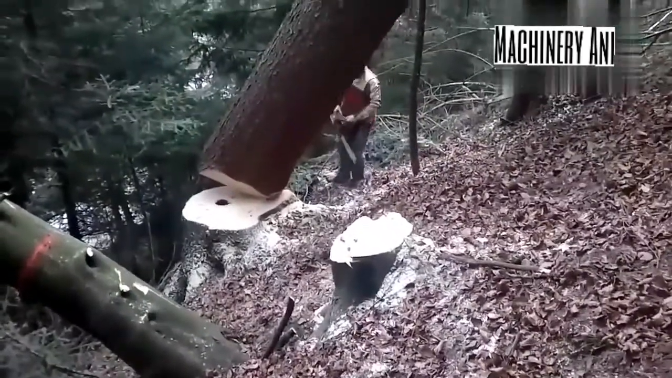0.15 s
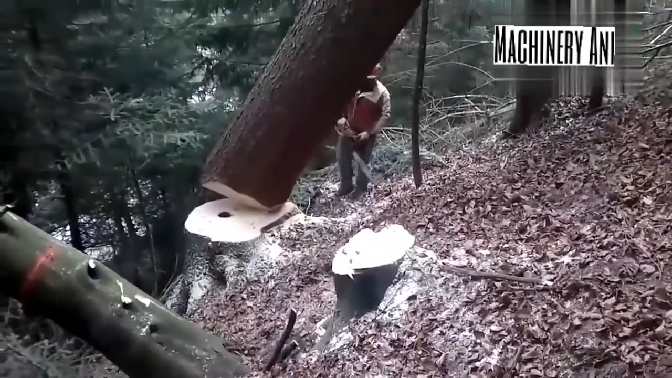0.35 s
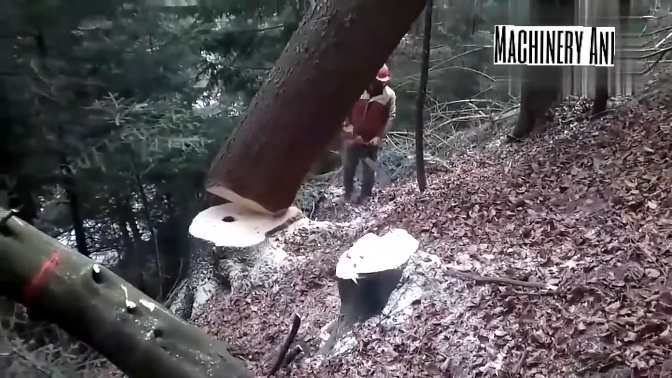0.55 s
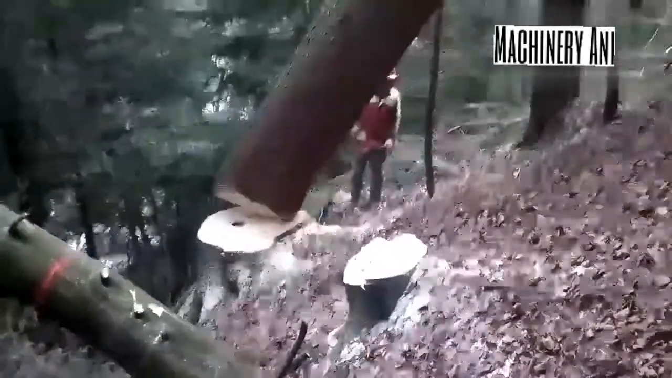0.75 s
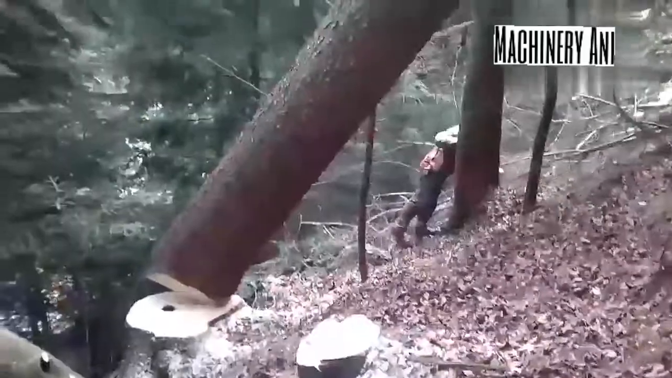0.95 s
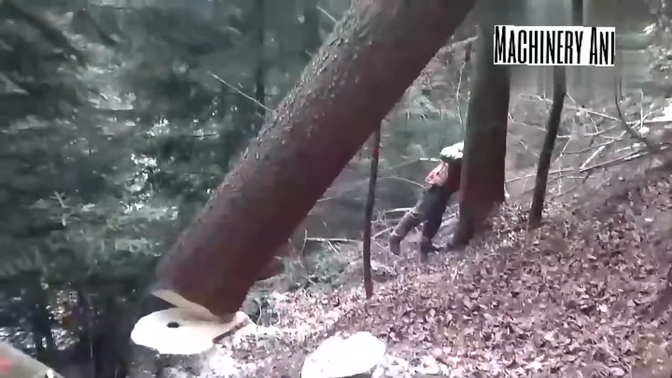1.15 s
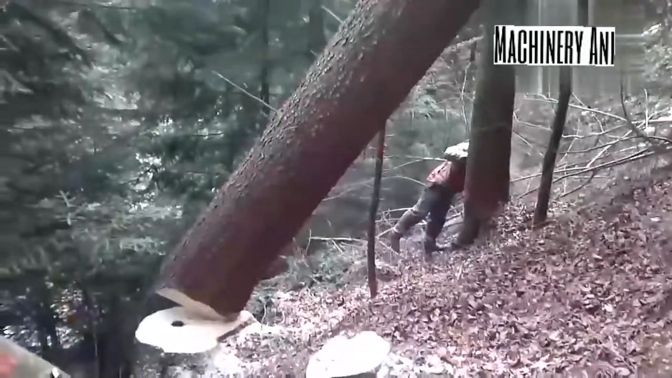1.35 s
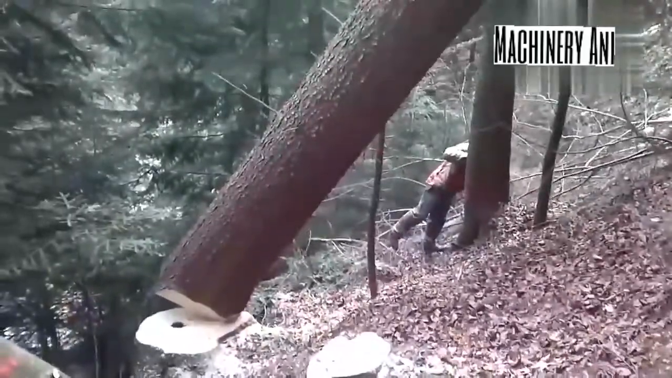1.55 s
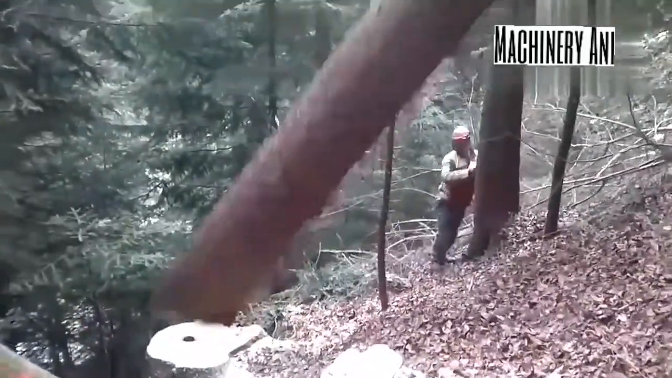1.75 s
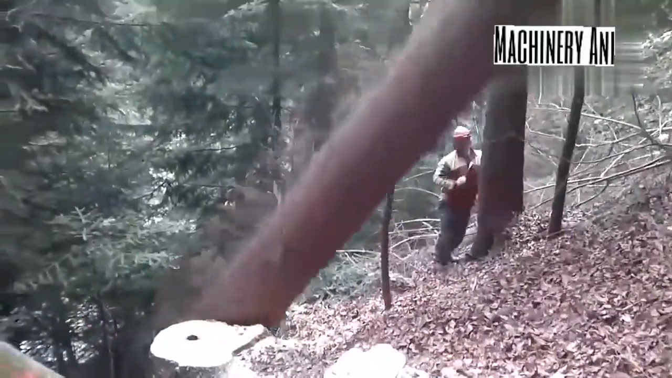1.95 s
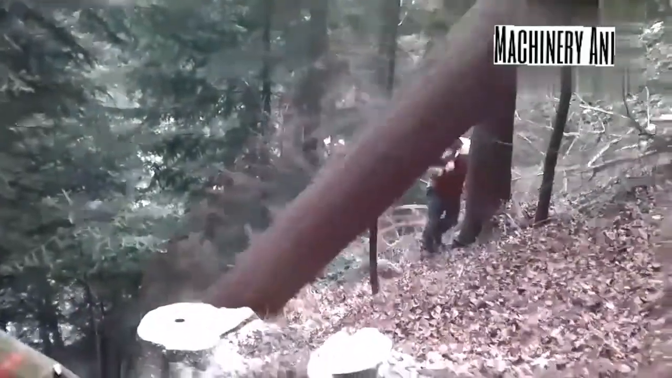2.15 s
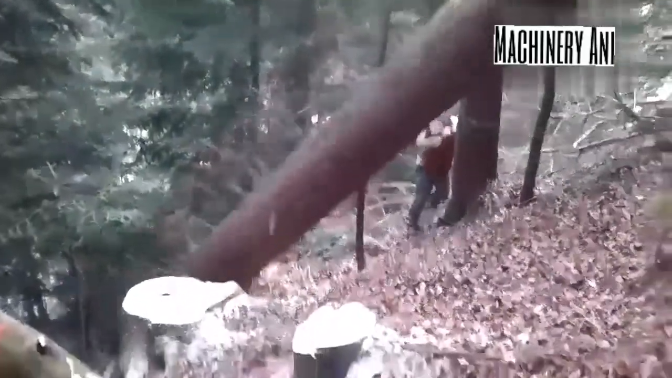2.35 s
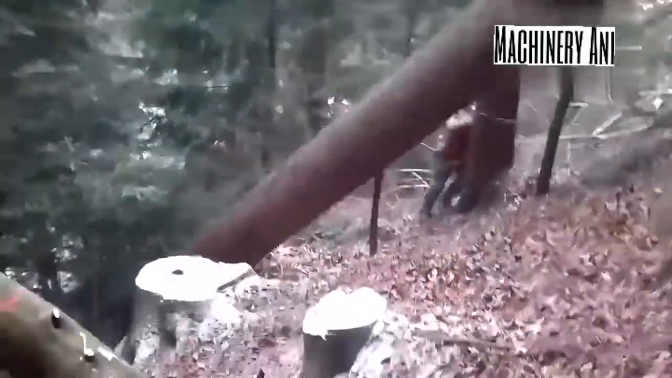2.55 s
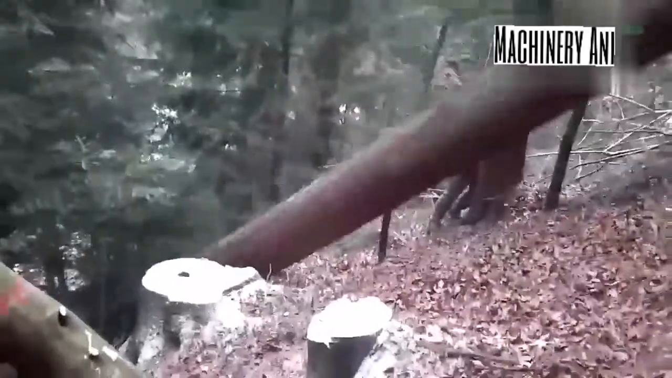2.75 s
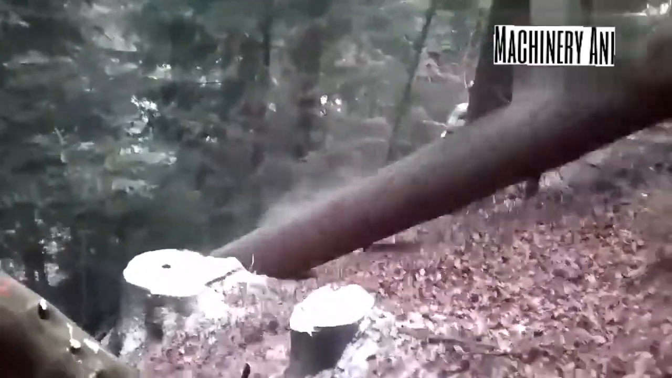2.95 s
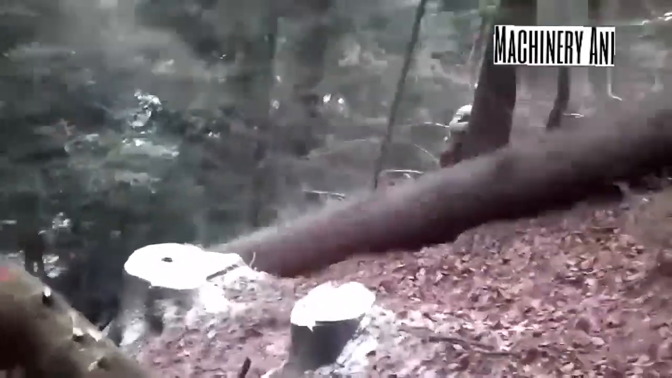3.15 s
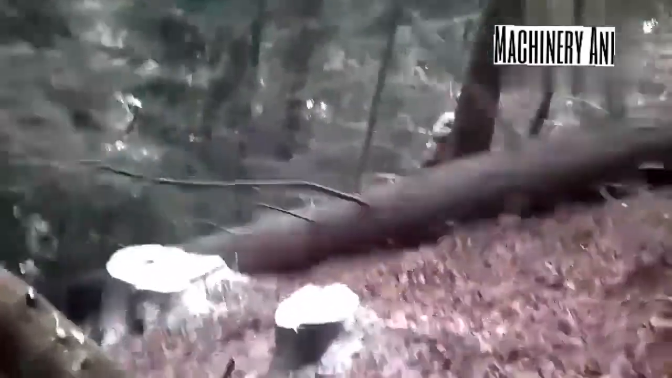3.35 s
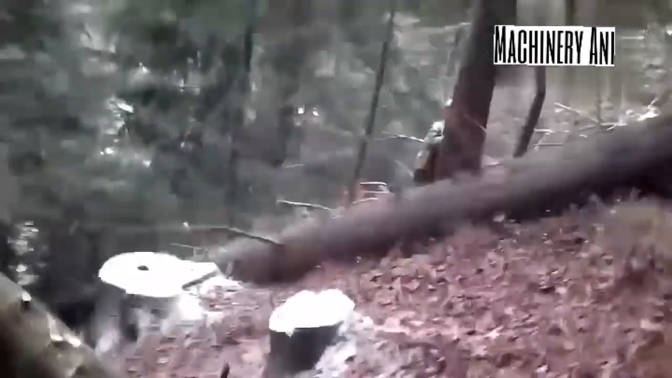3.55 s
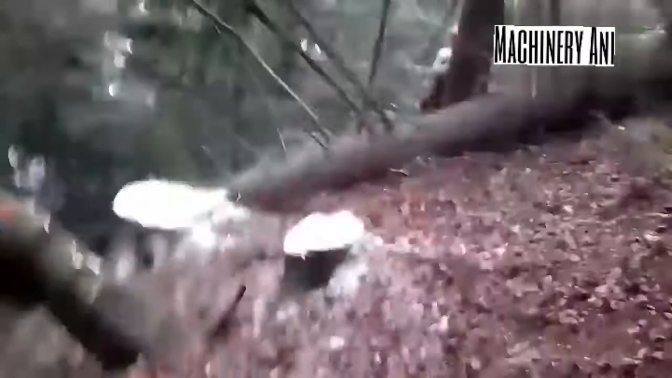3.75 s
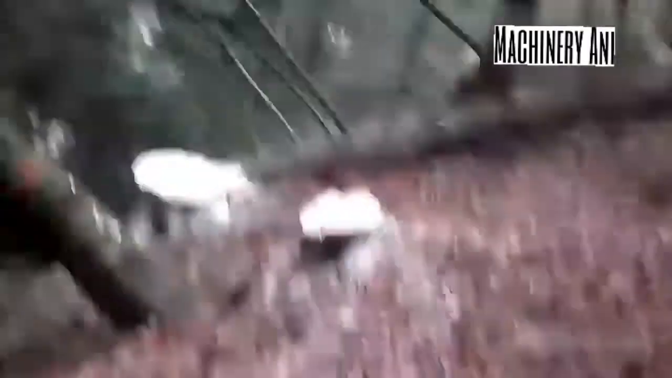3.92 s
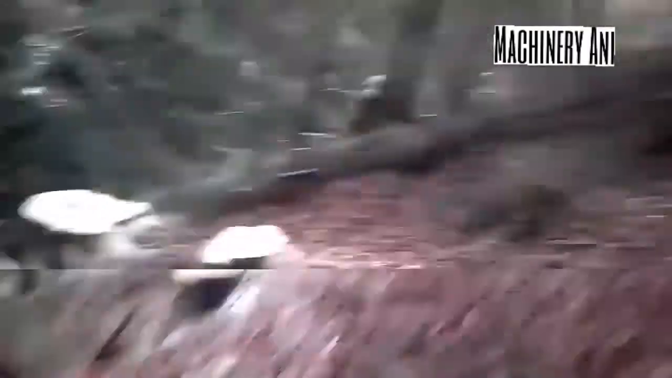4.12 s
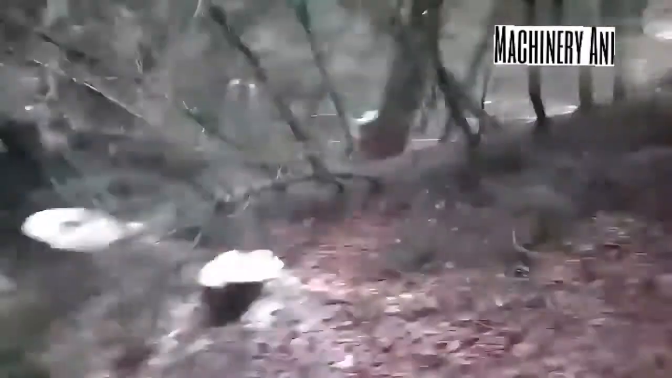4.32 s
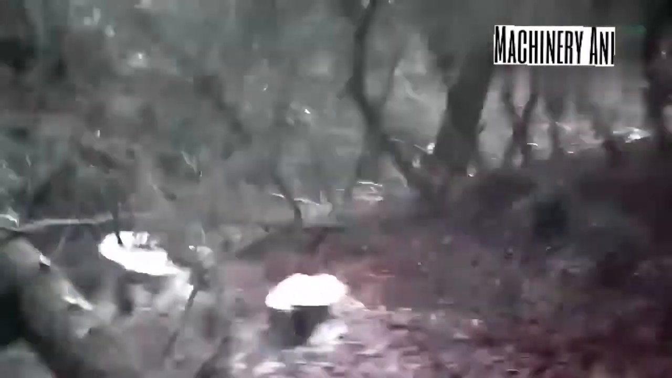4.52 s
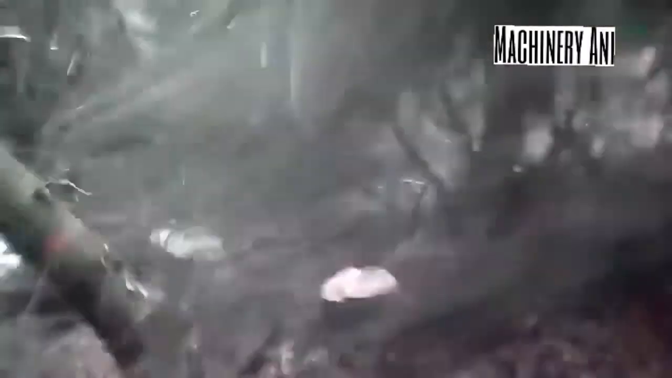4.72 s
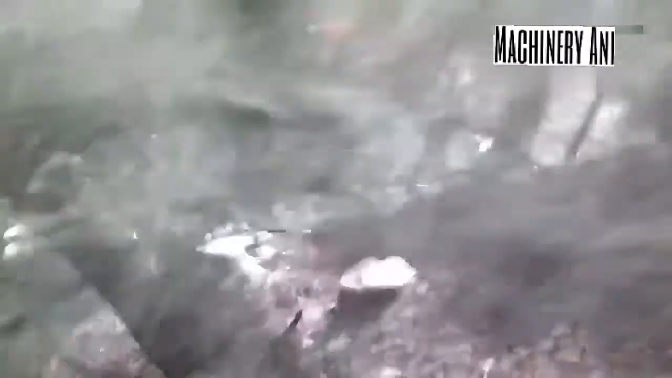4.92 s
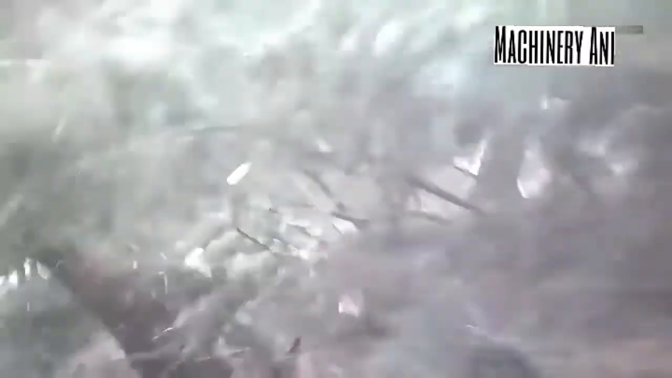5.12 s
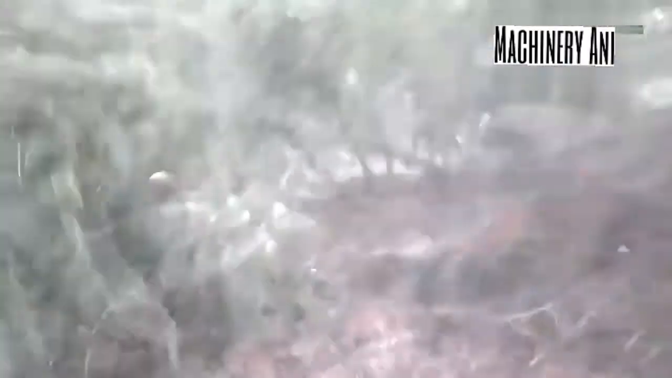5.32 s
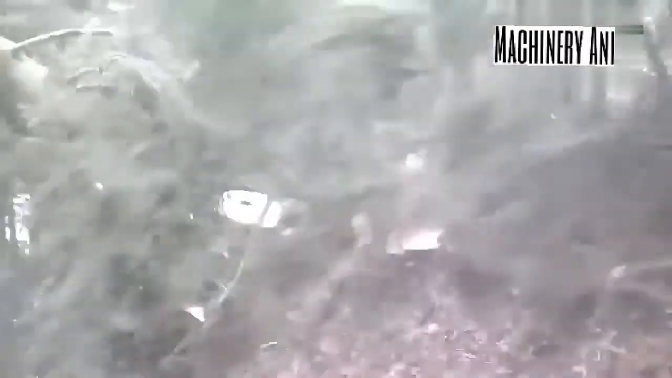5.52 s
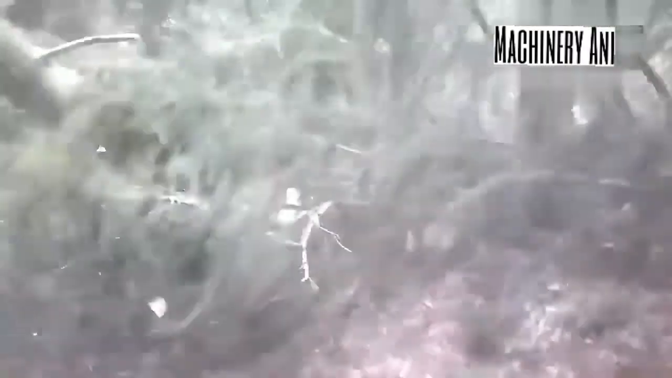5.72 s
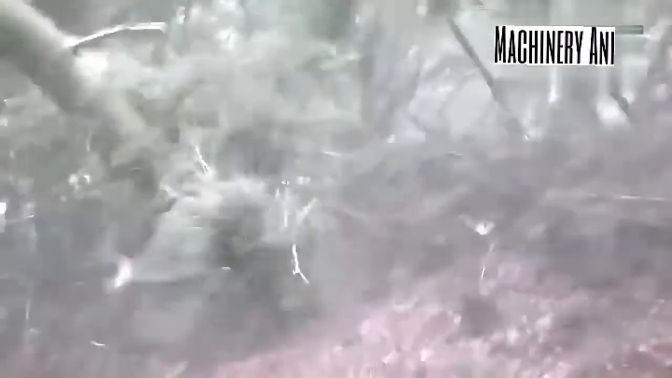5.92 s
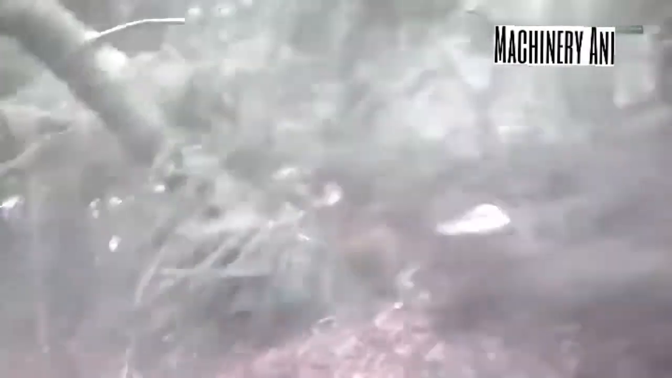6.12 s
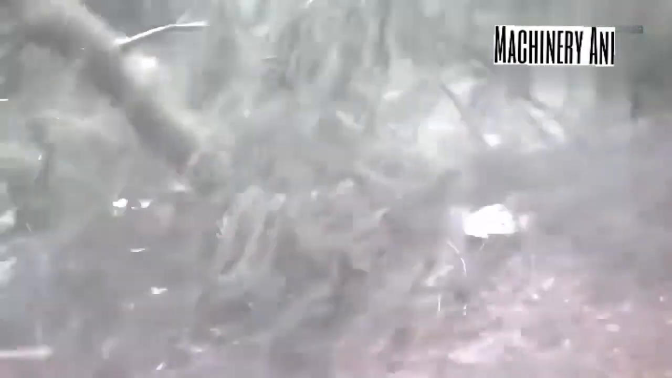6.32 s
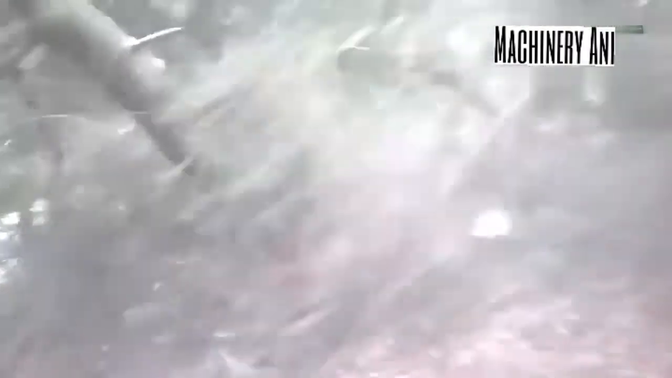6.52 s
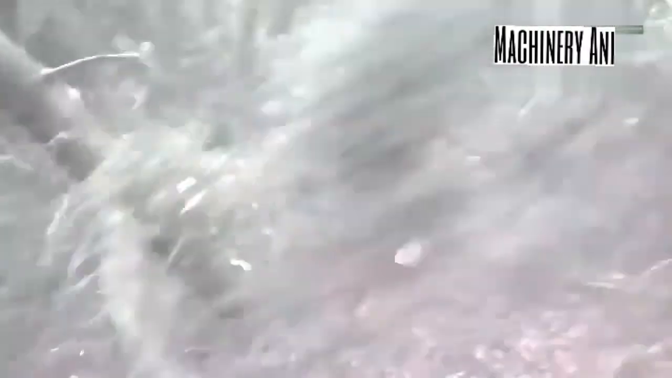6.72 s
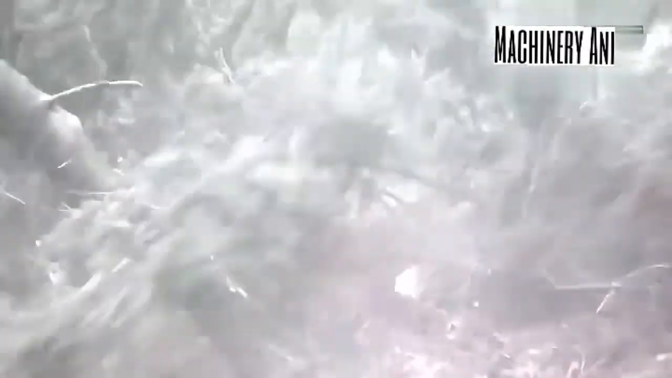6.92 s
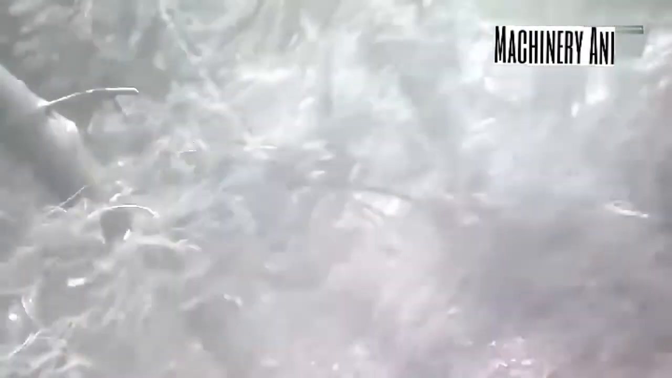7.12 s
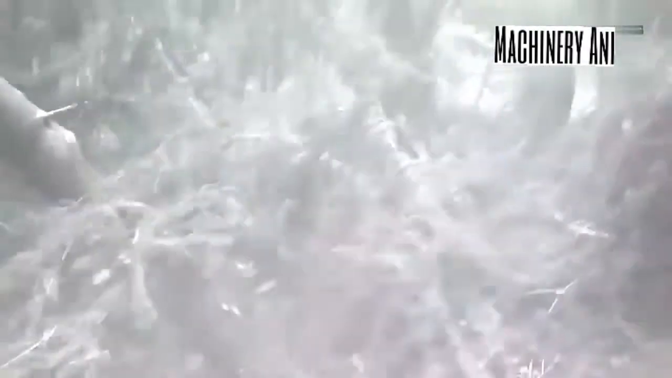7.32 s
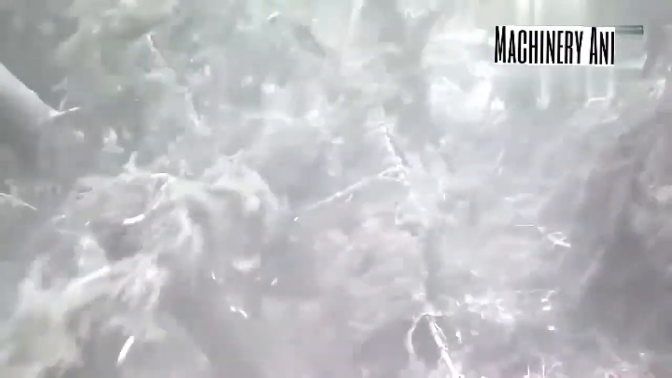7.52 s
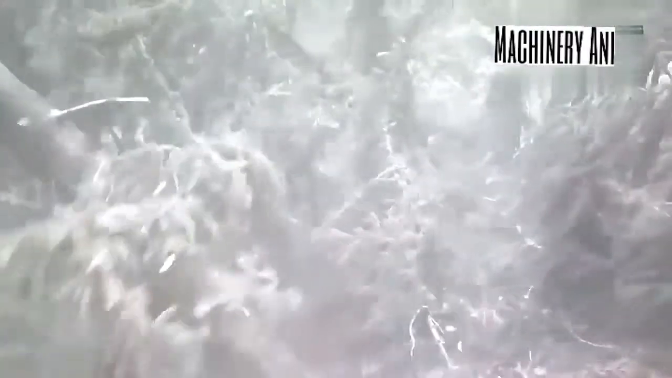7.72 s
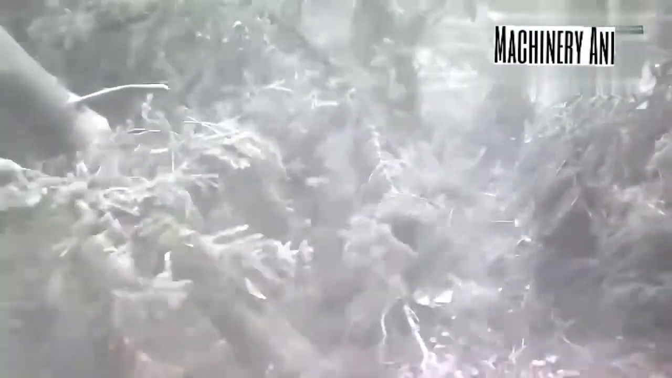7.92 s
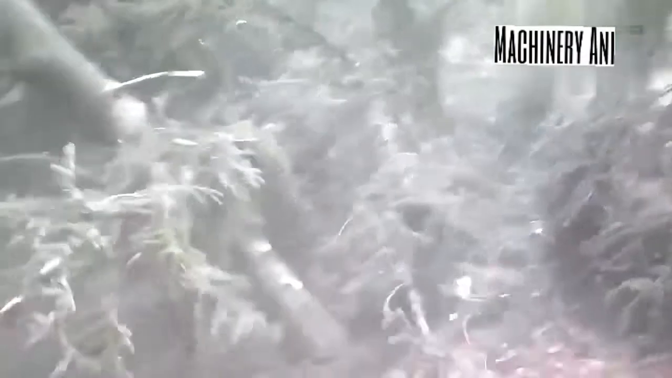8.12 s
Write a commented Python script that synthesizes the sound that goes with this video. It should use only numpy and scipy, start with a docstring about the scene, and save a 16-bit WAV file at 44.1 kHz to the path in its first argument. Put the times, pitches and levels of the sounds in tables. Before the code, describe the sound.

Quiet puttering saw idle first, then sparse dry wood ticks, each stretch cut off by a brief silence. A big spruce comes crashing down, far louder: bright hiss of needles, constant twig crackle, irregular hard snaps of branches, one deep sinking boom as the trunk lands, dull limb knocks and ground rumble. Outdoor slope among trees, single mono microphone, peaks slightly rounded, thin echoes.

```python
"""A spruce crown crashes through the forest: needles hiss, twigs crackle and boughs snap as volleys of tearing fibre.
The trunk booms on the slope as a sinking tone, and limbs thud into the soil as runs of knocks.
Before that the hinge wood ticks and cracks as the tree leans, and first a chainsaw idles beside the cut tree,
its pops ringing muffler and casing. Silent breaks part the three stretches. One microphone, heard in mono."""
import sys
import numpy as np
from scipy import signal
from scipy.fft import rfft, irfft
from scipy.io import wavfile
from scipy.ndimage import uniform_filter1d

SR = 44100
rng = np.random.default_rng(int(sys.argv[2]) if len(sys.argv) > 2 else 0)


def dump_mix(stems):
    """Bounce the given channels to the path in sys.argv[1] as a 16-bit WAV at rate SR."""
    frames = np.atleast_2d(stems).T  # one column per channel
    limited = np.clip(frames, -1, 1)  # hard clip at full scale
    pcm = np.round(limited * 32767).astype(np.int16)
    wavfile.write(sys.argv[1], SR, pcm)


N = 360076
TIME = np.arange(N) / SR
# stretches that sound, with silence between: (start t/s, end t/s)
SAW_SPAN, LEAN_SPAN, CRASH_SPAN = (-1, 1.066), (1.232, 2.066), (2.267, 9)


def from_db(db):
    """Amplitude factor of a level in dB."""
    return 10 ** (np.asarray(db) / 20)


def rms_one(x):
    """Scale a sound to rms 1."""
    return x / np.sqrt(np.mean(x ** 2) + 1e-20)


def in_time(rows):
    """Each column of a curve, at every sample."""
    s, *columns = np.transpose(rows)
    return [np.interp(TIME, s, column) for column in columns]


def during(span, fade_s=0.021):
    """One inside the span, with short fades centred on its ends."""
    start, end = span
    fade_in = np.clip((TIME - start) / fade_s + .5, 0, 1)
    fade_out = np.clip((end - TIME) / fade_s + .5, 0, 1)
    return fade_in * fade_out


def drift(rate_hz):
    """Slow random wander of rms 1: noise through a double low-pass."""
    step = 40  # samples between points of the wander
    r = np.exp(-2 * np.pi * rate_hz * step / SR)
    noise = rng.standard_normal(N // step + 2002)
    slow = signal.lfilter([1], [1, -2 * r, r * r], noise)[2000:]  # skip the filter's start
    return np.interp(np.arange(N) / step, np.arange(len(slow)), rms_one(slow))


def band(x, low_hz, high_hz, order=2):
    """Butterworth band-pass."""
    edges = [low_hz, min(high_hz, .45 * SR)]
    return signal.sosfilt(signal.butter(order, edges, "band", fs=SR, output="sos"), x + 1e-18)


def resonance(x, hz, width_hz):
    """One resonance, gain about 1 on top."""
    r = np.exp(-np.pi * width_hz / SR)
    zeros = np.array([1, 0, -1]) * (1 - r * r) / 2
    poles = [1, -2 * r * np.cos(2 * np.pi * hz / SR), r * r]
    return signal.lfilter(zeros, poles, x + 1e-18)


def coloured(x, colour):
    """Give a steady texture its spectrum; rms 1."""
    hz, db = np.transpose(colour)
    bins_hz = np.maximum(np.arange(N // 2 + 1) * SR / N, 1)
    gain = from_db(np.interp(np.log(bins_hz), np.log(hz), db))
    gain = gain * np.minimum(bins_hz / hz[0], 1) ** 2  # falls away below the first row
    return rms_one(irfft(rfft(x) * gain, N))


def whitened(x, width_hz=900):
    """Even out the broad tilt of a sound; narrow resonances and timing stay."""
    spectrum = rfft(x)
    broad_power = uniform_filter1d(np.abs(spectrum) ** 2, int(width_hz * N / SR))
    return irfft(spectrum / np.sqrt(np.abs(broad_power) + 1e-12), N)


def crackle(per_s, spread_db, clump_db, low_hz, high_hz, sharpness, count=14):
    """Clumps of tiny clicks, mostly weak, each ringing briefly at one of several pitches."""
    born = rng.random(N) < per_s * from_db(clump_db * drift(25)) / SR
    sizes = from_db(spread_db * np.minimum(rng.exponential(1, N), 4))
    clicks = born * sizes * rng.choice([-1, 1], N)
    dealt = rng.integers(0, count, N)
    pitches_hz = np.geomspace(low_hz, high_hz, count)
    return rms_one(sum(resonance(clicks * (dealt == k), hz, hz / sharpness) for k, hz in enumerate(pitches_hz)))


def volley(length, tail_share, grain_db):
    """Many small impulses that sag a little over a length in seconds and then die."""
    age = np.arange(SR // 5) / SR
    shape = np.exp(-.5 * age / length - np.maximum(age - length, 0) / (tail_share * length))
    fibres, sizes = rng.standard_normal((2, len(age)))
    return fibres * from_db(grain_db * sizes) * shape


def add(out, s, sound, db, length):
    """Place a sound at a time, with the energy of its level held over its length."""
    at = round(s * SR)
    scale = from_db(db) * np.sqrt(length * SR / np.sum(sound ** 2))
    out[at:at + len(sound)] += (scale * sound)[:N - at]


def swells(rows, attack_s, release_s):
    """Joint amplitude of events that each rise, hold for their length and die."""
    power = np.zeros(N)
    for s, db, _, length in rows:
        before = np.maximum(s - TIME, 0) / attack_s
        after = np.maximum(TIME - s - length, 0) / release_s
        power += from_db(db) ** 2 * np.exp(-2 * np.minimum(before + after, 20))
    return np.sqrt(power)


def around_landing(peak_db, rise_db_per_s, drop_db, fade_db_per_s):
    """Level in dB that climbs until the crown meets the slope, drops quickly and then ebbs."""
    landing_s, drop_s = 3.5, 0.07
    before, after = np.maximum(landing_s - TIME, 0), np.maximum(TIME - landing_s, 0)
    drop = drop_db * (1 - np.exp(-after / drop_s))
    return peak_db - rise_db_per_s * before - drop - fade_db_per_s * after


# the crown on its way down: (t/s, needles level/dB, twigs level/dB)
CROWN_LEVELS = [(2.3, -23.5, -29), (2.75, -24, -33.5), (3.15, -20.5, -31), (3.38, -20, -30.5),
                (3.53, -19.5, -17), (3.68, -26, -30), (3.95, -21.5, -32.5), (4.33, -22, -25.5),
                (4.72, -23.5, -29), (5.15, -20, -29), (5.55, -20, -34), (6.1, -21.5, -31),
                (7.48, -23.3, -37.5), (7.65, -25.5, -36), (8.16, -27, -42.5)]
# spectra of needles, twigs and swish: (f/Hz, relative level per Hz/dB)
NEEDLE_SPECTRUM = [(500, -15.5), (1500, -2), (3000, 3), (4500, 1.5), (5600, 4), (7200, 2), (9200, 4),
                   (12000, 1.5), (14000, -2.5), (15800, -10)]
TWIG_SPECTRUM = [(400, -9.5), (700, 0), (1000, 5), (1500, 3.5), (2100, 3.5), (2700, 0.5), (4000, -0.5),
                 (7000, -8), (14000, -42)]
SWISH_SPECTRUM = [(100, -1), (220, -2), (400, 0), (650, -1.5), (1000, -4.5), (2500, -19.5)]


def crown():
    """Needles hiss in flurries, twigs break by the hundred and boughs swish through the air."""
    needle_db, twig_db = in_time(CROWN_LEVELS)
    fine = crackle(per_s=12000, spread_db=2.4, clump_db=2, low_hz=2000, high_hz=14000, sharpness=4)
    coarse = crackle(per_s=1100, spread_db=4.0, clump_db=3.0, low_hz=700, high_hz=6060, sharpness=5.0)
    # narrow ringing ticks at many pitches, in clumps
    ringing_ticks = crackle(per_s=60, spread_db=3.0, clump_db=6.5, low_hz=1200, high_hz=11000, sharpness=40, count=24)
    dull_ticks = crackle(per_s=100, spread_db=4.0, clump_db=2.5, low_hz=3000, high_hz=11700, sharpness=2.5)
    hiss = fine + 1.47 * rng.standard_normal(N) + from_db(-10) * ringing_ticks + from_db(-10) * dull_ticks
    needles = from_db(needle_db + 0.69 * drift(29)) * coloured(hiss, NEEDLE_SPECTRUM)
    # shattered twigs trail each snap
    tails = from_db(-19.5) * swells(SNAPS, attack_s=0.0018, release_s=0.027)
    breaking = coarse + 1.6 * rng.standard_normal(N) + from_db(-3.5) * ringing_ticks
    twigs = np.hypot(from_db(twig_db), tails) * coloured(breaking, TWIG_SPECTRUM)
    swish_db = around_landing(peak_db=-29.5, rise_db_per_s=3, drop_db=6, fade_db_per_s=2.5)
    swish = from_db(swish_db) * coloured(rng.standard_normal(N), SWISH_SPECTRUM)
    return needles + twigs + swish


# breaking wood, the hinge first and then the boughs: (t/s, level/dB, lowest pitch f/Hz, length of the tear/s)
SNAPS = [(1.421, -34, 1390, .0053), (1.531, -30.5, 7400, 0.0034), (1.614, -30.5, 4740, 0.0056),
         (1.629, -28.5, 5700, 0.0057), (1.694, -33, 4500, 0.011), (1.779, -38, 5000, .0035),
         (1.833, -37, 4500, .004), (1.86, -22, 2700, 0.0073), (1.996, -35, 3480, 0.012),
         (2.267, -5.5, 3300, 0.0044), (2.281, -14, 2730, 0.0047), (2.295, -11, 3500, 0.0014),
         (2.326, -24, 620, .023), (2.447, -21.5, 3000, 0.0032), (2.577, -19, 2500, .0047),
         (2.76, -7, 4440, 0.0024), (2.84, -19, 1900, 0.0083), (2.913, -17.5, 3010, .0055),
         (3.196, -23, 2100, 0.0045), (3.264, -17.5, 1400, .0088), (3.379, -11.5, 1130, 0.012),
         (3.402, -10, 1750, 0.0047), (3.437, -15, 1450, 0.025), (3.474, -11.5, 1200, 0.013),
         (3.503, -19, 1200, 0.0081), (3.546, -15, 1310, .008), (3.664, -21, 1100, 0.007),
         (3.921, -12.5, 1460, 0.0042), (4.221, -15.5, 1500, 0.0032), (4.357, -12.5, 890, 0.013),
         (4.376, -14.5, 1400, 0.0073), (4.429, -9, 1100, 0.0073), (4.521, -13, 1040, 0.0069),
         (4.607, -12, 2500, 0.0058), (4.649, -15.5, 1450, 0.0084), (4.793, -11.5, 1235, 0.0088),
         (4.819, -14.5, 1310, 0.0066), (4.904, -10.5, 920, .012), (5.013, -20, 1600, 0.0085),
         (5.344, -11.5, 3000, 0.0029), (5.492, -13.5, 2500, .0054), (6.032, -16.5, 970, 0.013),
         (6.152, -10, 1400, 0.0065), (6.239, -17, 2200, .0034), (6.32, -9, 1260, 0.0092),
         (6.551, -7, 1710, 0.0079), (6.622, -19, 4200, .003), (6.712, -18, 1200, 0.0048),
         (6.863, -21, 1900, 0.0085), (7.016, -13, 1290, 0.0036), (7.046, -15, 2600, .0024),
         (7.079, -18.5, 1200, 0.0036), (7.363, -12.5, 1150, 0.0055), (7.55, -13.5, 2060, .0053),
         (7.568, -9, 1140, 0.011), (7.801, -19.5, 1420, 0.0051), (7.933, -19.5, 2900, 0.0032),
         (7.966, -21, 1710, .0067)]


def snaps(rows):
    """Fibres tear in a volley: bright splinters over the short, woody ring of the bough near its lowest pitch."""
    out = np.zeros(N)
    for s, db, low_hz, length in rows:
        high_hz = 3640 * (low_hz / 1200) ** 0.87  # the splinters' top climbs with the pitch
        tear = volley(length, tail_share=0.6, grain_db=2.0)
        splinters = band(tear, low_hz, high_hz) + from_db(9.0) * band(tear, low_hz, high_hz, order=1)
        wood_hz = 1.08 * low_hz
        wood = resonance(tear, wood_hz, wood_hz / 2.5)
        add(out, s, rms_one(splinters) + from_db(-4.5) * rms_one(wood), db, length)
    return out


def small_branches():
    """Chance snaps while the crown moves, as rows like those of the boughs."""
    per_s, lowest_hz, highest_hz, tear_s = 10, 1100, 3860, 0.0043
    below_needles_db, spread_db = 3.5, 8.5
    needle_db, _ = in_time(CROWN_LEVELS)
    stretch_s = TIME[-1] - CRASH_SPAN[0]
    rows = []
    for when, size, pitch, tear in rng.random((int(per_s * stretch_s), 4)):
        s = CRASH_SPAN[0] + when * stretch_s
        db = needle_db[int(s * SR)] - below_needles_db + spread_db * (2 * size - 1)
        low_hz = lowest_hz * (highest_hz / lowest_hz) ** pitch
        rows.append((s, db, low_hz, tear_s * (.5 + tear)))
    return rows


def trunk():
    """The stem beds into the soil: a few heavy swings, ever slower."""
    start_s, level_db, start_hz, sag_hz_per_s = 3.683, -16, 110, 720
    attack_s, hold_s, release_s = 0.0045, .062, .016
    age = np.maximum(TIME - start_s, 0)
    hz = np.maximum(start_hz - sag_hz_per_s * age, start_hz / 3)
    shape = np.minimum(age / attack_s, 1) * np.exp(-np.maximum(age - hold_s, 0) / release_s)
    swing = np.sqrt(2) * np.sin(2 * np.pi * np.cumsum(hz * (age > 0)) / SR)
    return from_db(level_db) * shape * swing


def knocks(length):
    """Unevenly spaced contacts of one limb with the soil, on the whole hardest in the middle of the run."""
    gap_s, edge_db, spread_db = .022, -3, 3.5
    count = max(round(length / gap_s), 1)
    place = np.arange(count)
    uneven = 0.256 * rng.uniform(-1.003, 1, count) * (place > 0)  # the first contact is on time
    at_s = np.maximum(place + uneven, 0) * gap_s
    from_middle = 2 * (place + .5) / count - 1
    strength = from_db(edge_db * from_middle ** 2 + spread_db * rng.standard_normal(count))
    train = np.zeros(SR // 5)
    train[np.minimum((at_s * SR).astype(int), len(train) - 1)] = strength
    return train


# limbs hitting the soil: (t/s, level/dB, centre f/Hz, length/s)
LIMB_THUDS = [(1.715, -52, 230, .04), (1.857, -49, 300, 0.015), (2.316, -23, 170, 0.037),
              (2.384, -27, 282, .021), (2.452, -29.5, 110, .04), (3.559, -23.5, 160, 0.036),
              (3.684, -22.5, 208, 0.017), (3.911, -32, 189, 0.023), (4.603, -28.5, 110, .07),
              (4.986, -22, 85, .025), (5.022, -24, 350, .014), (5.723, -21, 206, .11),
              (6.021, -21.5, 218, 0.15), (6.2, -27, 150, 0.098), (6.937, -27, 150, 0.095),
              (7.274, -24, 109, 0.073), (7.589, -28.5, 139.5, 0.078), (8.076, -33, 108, 0.031)]


def thuds():
    """Each knock gives the soil a dead push and the limb a dull ring, with a patter of clods and litter."""
    wood_hz, wood_width_hz = 520, 380
    out = np.zeros(N)
    for s, db, hz, length in LIMB_THUDS:
        touches = knocks(length)
        push = band(touches, hz / 3.15, hz * 1.56)
        wood = resonance(band(touches, hz, 4 * hz), wood_hz, wood_width_hz)
        patter = band(volley(length, tail_share=0.13, grain_db=11.0), hz / 3.1, hz * 1.63)
        wood_gain = from_db(-9) * hz / wood_hz * 2  # higher thuds ring more
        thud = rms_one(patter) - from_db(2.5) * rms_one(push) + wood_gain * rms_one(wood)
        add(out, s, thud, db, length)
    return out


# spectrum of the leaning tree: (f/Hz, relative level per Hz/dB)
LEAN_SPECTRUM = [(50, -9.5), (200, -13), (400, -11.5), (800, -7.5), (1500, -2.5), (2600, -5), (4500, -6.5),
                 (6000, -5.5), (9800, -2.5), (12000, -7), (15500, -16)]


def leaning():
    """The crown stirs and the hinge fibres tick, most of all after each crack."""
    start_db, rise_db_per_s = -43.5, 2
    lean_s = np.clip(TIME, *LEAN_SPAN) - LEAN_SPAN[0]
    stir = from_db(start_db + rise_db_per_s * lean_s)
    tails = from_db(-11) * swells(SNAPS, attack_s=.002, release_s=0.1)
    ticks = crackle(per_s=610, spread_db=0.5, clump_db=9.0, low_hz=900, high_hz=13000, sharpness=2.9)
    return np.hypot(stir, tails) * coloured(rng.standard_normal(N) + 0.69 * ticks, LEAN_SPECTRUM)


# exhaust and casing spectrum: (f/Hz, relative level per Hz/dB)
SAW_SPECTRUM = [(29, -34.5), (50, -11), (144, -14), (221, -10), (295, -9.5), (375, -15.5), (455, -12),
                (1440, -15.5), (2020, -20), (2330, -25), (3180, -24), (3850, -29.5), (5790, -25),
                (10600, -31.5), (15500, -48)]
# muffler and casing resonances, low to high: (f/Hz, width/Hz, relative level/dB)
SAW_RESONANCES = [(450, 70, -7), (880, 90, -2), (1160, 100, -2), (1420, 90, 1), (1980, 200, 1),
                  (3100, 170, 2), (4180, 130, -2), (5330, 50, 0), (5850, 200, 0), (6750, 250, -1),
                  (9000, 300, 0), (10500, 110, 8)]
# clean engine orders, the upper ones a whine: (multiple of the firing rate, level/dB)
ENGINE_ORDERS = [(1, -49), (2, -49), (4, -43.5), (6, -54), (8, -55), (12, -51.5), (18, -54), (19, -50),
                 (27, -57)]


def chainsaw():
    """A two-stroke at idle catches only every second or third turn; each pop rings the muffler and casing."""
    # the idle creeps up and settles, wavering a little
    start_hz, settled_hz, settle_s, waver_hz = 65.6, 76.6, .38, 0.16
    creep_hz = (start_hz - settled_hz) * np.exp(-TIME / settle_s)
    firing_hz = settled_hz + creep_hz + waver_hz * drift(14)
    turns = np.cumsum(firing_hz) / SR
    count = int(turns[-1]) + 1
    caught = np.isin(np.arange(count), np.cumsum(rng.choice([2, 2, 3], count)))
    turn_db = -5.5 * ~caught + rng.standard_normal(count)  # turns that miss are weaker
    strength = from_db(turn_db)[turns.astype(int)]
    puff_s = .003
    puffs = strength * np.exp(-(turns % 1) / firing_hz / puff_s)
    kicks = np.diff(np.floor(turns), prepend=0) * strength
    # a kick and a puff of gas leave the muffler
    exhaust = 4.5 * kicks + 0.62 * rng.standard_normal(N) * puffs
    pops = resonance(band(exhaust, 80, 2600), hz=950, width_hz=600)
    # they come again off the ground, by a path little more than a metre longer
    echo_s = 0.0037
    pops = pops + 0.2 * np.interp(TIME - echo_s, TIME, pops)
    # the casing buzzes all through the turn, a little more at each pop
    casing = 0.26 * rng.standard_normal(N) * (1.65 + 1.0 * puffs)
    source = whitened(4 * pops + casing)
    ringing = sum(from_db(db) * resonance(source, hz, width) for hz, width, db in SAW_RESONANCES)
    clatter_db = -34 + 0.16 * (firing_hz - settled_hz)  # louder as the idle climbs
    clatter = from_db(clatter_db) * coloured(1.13 * source + ringing, SAW_SPECTRUM)
    hum = np.zeros(N)
    for order, db in ENGINE_ORDERS:
        hum += from_db(db) * np.sqrt(2) * np.sin(2 * np.pi * (order * turns + rng.random()))
    return (clatter + hum * from_db(0.89 * drift(28))) * during(SAW_SPAN)


# the slack chain clinks on the bar: (t/s, level/dB)
CHAIN_CLINKS = [(0.147, -37), (0.190, -34.5), (0.344, -35), (0.400, -38), (0.576, -35.5), (0.617, -40),
                (0.710, -40), (0.804, -35), (0.870, -39)]


def chain():
    """Loose links rattle briefly and ring the bar at the saw's highest resonances."""
    out = np.zeros(N)
    for s, db in CHAIN_CLINKS:
        links = band(volley(.003, tail_share=0.8, grain_db=3), 2000, 10500, order=3)
        bar = sum(resonance(links, hz, width) for hz, width, _ in SAW_RESONANCES[-4:])
        add(out, s, 0.36 * links + bar, db, .004)
    return out


# spectrum of the shaking ground: (f/Hz, relative level per Hz/dB)
GROUND_SPECTRUM = [(20, -17), (40, -3), (65, 1.5), (100, 3), (170, -3.5), (280, -10), (600, -29),
                   (1500, -41)]


def ground():
    """The slope rumbles under the sliding tree and shakes at every limb that hits it."""
    rumble_db = around_landing(peak_db=-27, rise_db_per_s=11.5, drop_db=2.5, fade_db_per_s=2.6)
    rumble = from_db(rumble_db) * during(CRASH_SPAN)
    shakes = from_db(-4) * swells(LIMB_THUDS, attack_s=0.039, release_s=0.058)
    return np.hypot(rumble, shakes) * coloured(rng.standard_normal(N), GROUND_SPECTRUM)


def forest(x, dull_hz):
    """Trunks and slope scatter a thin tail of echoes."""
    t60_s = 0.22
    age = np.arange(SR) / SR
    sparse = rng.standard_normal(SR) * (rng.random(SR) < .1)
    echoes = sparse * from_db(-60 * age / t60_s) * (age > .006)  # the first echo comes after 6 ms
    echoes = band(echoes, 140, dull_hz, order=1)
    return signal.fftconvolve(x, echoes / np.sqrt(np.sum(echoes ** 2)))[:N]


def scene():
    """The saw, the leaning tree and the crash, each in its own stretch, alike in both channels."""
    crash, lean, saw = crown(), leaning(), chainsaw() + chain()
    blows = snaps(SNAPS) + snaps(small_branches()) + trunk() + thuds()
    blows = blows + from_db(-14) * forest(blows, dull_hz=7000) + ground()
    lean_part = (lean + blows) * during(LEAN_SPAN)
    crash_part = (crash + blows) * during(CRASH_SPAN, fade_s=0.0037)
    mono = saw + lean_part + crash_part
    return np.array([mono, mono])


def record(dry):
    """Peaks are rounded near full scale, then a steep low-pass cuts the top."""
    cutoff_hz = 15900
    rounded = 1.1 * np.tanh(dry / 1.1)
    return signal.sosfilt(signal.ellip(12, .1, 100, cutoff_hz, fs=SR, output="sos"), rounded)


dry = scene()
out = record(dry)
dump_mix(out)
```